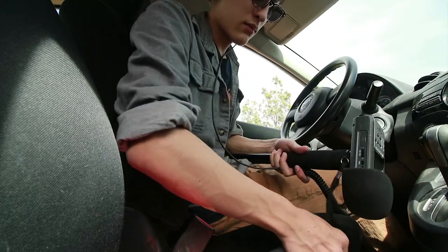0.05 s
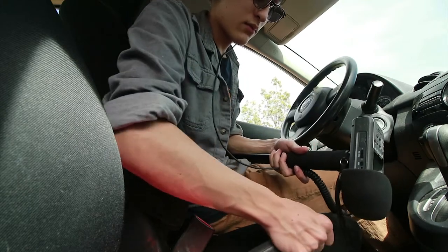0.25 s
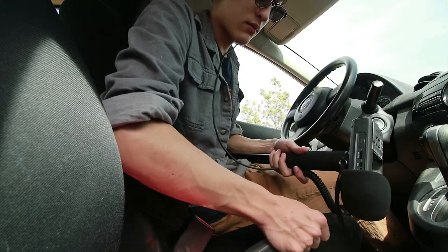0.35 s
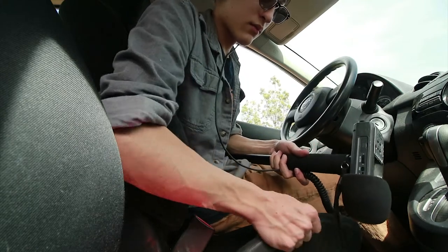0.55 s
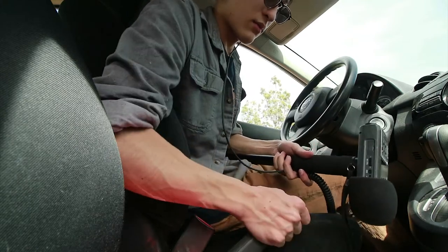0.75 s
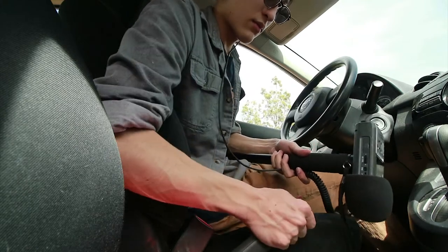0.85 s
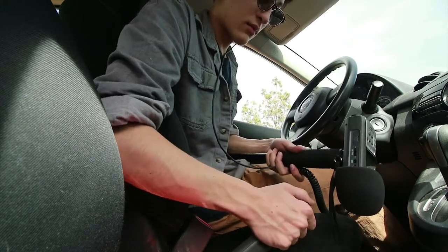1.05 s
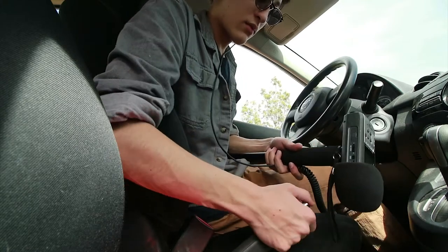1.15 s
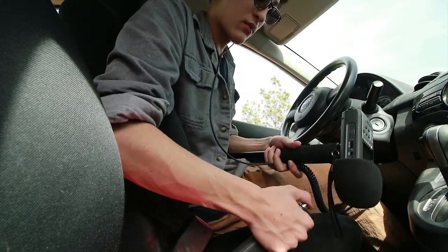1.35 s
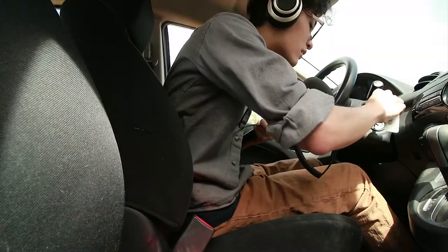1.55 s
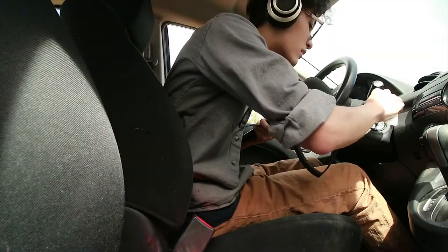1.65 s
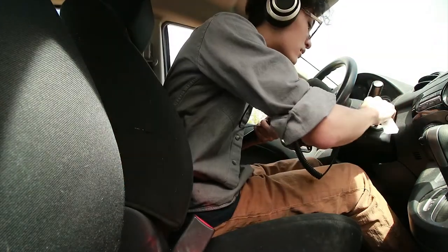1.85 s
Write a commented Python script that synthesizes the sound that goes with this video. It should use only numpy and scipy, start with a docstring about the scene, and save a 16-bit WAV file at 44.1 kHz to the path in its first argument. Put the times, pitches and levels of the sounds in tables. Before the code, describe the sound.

Sharp ratchet clicks of a handbrake being pulled up, close to the microphone in a dry, quiet car cabin. A soft low knock follows, then small plastic clicks from a dashboard control, over faintly rustling cloth.

```python
"""A sleeve rustles and a handbrake ratchets up inside a parked car: its pawl snaps over seven teeth,
each impact exciting the modes of pawl, plate, lever and console. The lever settles with a knock that
shakes the floor. A hand then works a dashboard control in small plastic clicks, one of which sets a
tiny spring ringing. Upholstery absorbs nearly all reverberation; a faint background lies beneath."""
import sys
import numpy as np
from scipy import signal
from scipy.io import wavfile

SR = 44100
rng = np.random.default_rng(int(sys.argv[2]) if len(sys.argv) > 2 else 0)


def dump(signal):
    """Clip the signal to [-1, 1] and save it as 16-bit WAV at the path in sys.argv[1]."""
    limited = np.clip(np.atleast_2d(signal).T, -1, 1)
    pcm = np.round(limited * 32767).astype(np.int16)
    wavfile.write(sys.argv[1], SR, pcm)


N = 83790
AGE = np.arange(SR // 4) / SR   # time since an impact [s]
BAND_EDGES = np.geomspace(22, 17000, 40)   # [Hz]
CENTRES = np.sqrt(BAND_EDGES[1:] * BAND_EDGES[:-1])
SWELL_CYCLES, SOFT_RISE_S = 1, 0.00067   # added build-up, longer for low notes; onset of a soft contact


def from_db(db):
    """Amplitude ratio: a factor of ten for every 20 dB."""
    return 10 ** (np.asarray(db) / 20)


def unit_rms(x):
    """Power normalisation: each row is scaled to rms 1."""
    return x / np.sqrt(np.mean(x ** 2, axis=-1, keepdims=True) + 1e-20)


def at_bands(points):
    """Interpolation in log frequency: (frequency [Hz], value) points read at the band centres."""
    hz, value = np.transpose(points)
    return np.interp(np.log(CENTRES), np.log(hz), value)


def add(out, start_s, sound):
    """Superposition: a sound adds to the mix from its start time on."""
    start = int(start_s * SR)
    out[start:start + len(sound)] += sound[:N - start]


def noise_bands(size):
    """Band-limited noise at rms 1; two alternating sources keep neighbouring bands incoherent."""
    white = rng.standard_normal((2, size + len(AGE)))
    bands = []
    for k, edges in enumerate(zip(BAND_EDGES, BAND_EDGES[1:])):
        bandpass = signal.butter(2, edges, "band", fs=SR, output="sos")
        bands.append(signal.sosfilt(bandpass, white[k % 2])[-size:])
    return unit_rms(np.array(bands))


def band_gains(density_db):
    """Band power is spectral density times bandwidth; the gains share unit power."""
    gains = from_db(density_db) * np.sqrt(np.diff(BAND_EDGES))
    return gains / np.linalg.norm(gains)


def envelope(rise, hold, t60, early_share=0.38, early_t60=0.012):
    """Two-slope exponential decay after a rise and hold; one row for each t60."""
    rise, t60 = np.reshape(rise, (-1, 1)), np.reshape(t60, (-1, 1))
    attack = np.minimum(AGE / (rise + 1 / SR), 1)
    fall = np.maximum(AGE - rise - hold, 0) * np.log(1000)
    early_drop = 1 - early_share + early_share * np.exp(-fall / early_t60)
    return attack * np.exp(-fall / t60) * early_drop


def dense_ring(density_db, shape, body=0, likeness=0):
    """Modal overlap: crowded modes decay as noise; blows on one body share part of their pattern."""
    pattern = np.sqrt(likeness) * body + np.sqrt(1 - likeness) * noise_bands(len(AGE))
    top_band_rms = np.sqrt(np.mean(shape[-1] ** 2))
    return band_gains(density_db) @ unit_rms(pattern * shape) * top_band_rms


def modal_ring(modes, rise, hold=0, scatter_db=0):
    """Free vibration: separate damped sinusoids of random phase, with optional scatter in level."""
    hz, db, t60 = np.transpose(modes)
    waves = np.sin(2 * np.pi * (hz[:, None] * AGE + rng.random((len(hz), 1))))
    strengths = from_db(db + scatter_db * rng.standard_normal(len(hz)))
    return strengths @ (waves * envelope(rise, hold, t60))


# background spectrum: (frequency [Hz], relative density [dB])
BACKGROUND_SPECTRUM = [(15, -33), (25, -7.5), (82, -1.5), (200, -9), (293, -3.5), (754, -7), (818, -13.5),
                       (911, -1.5), (1330, -14.5), (1520, -11), (5730, -19.5), (16000, -30.5)]
def background(level_db=-71):
    """Stationary noise: a faint, steady rush, densest at low frequencies."""
    return from_db(level_db) * (band_gains(at_bands(BACKGROUND_SPECTRUM)) @ noise_bands(N))


def cabin_tail(sound, level_db=-40, t60=0.47, corner_hz=2501):
    """Reverberation: convolution with the weak, dull reflections from glass and trim."""
    spectrum = -10 * np.log10(1 + (CENTRES / corner_hz) ** 2)
    response = band_gains(spectrum) @ (noise_bands(len(AGE)) * envelope(rise=0.00502, hold=0, t60=t60))
    return from_db(level_db) * signal.fftconvolve(sound, response / np.linalg.norm(response))[:N]


# loudness of the moving sleeve: (time [s], level [dB])
SLEEVE_LEVEL = [(0, -78), (.12, -73), (.17, -63), (.35, -70), (.56, -66.5), (.8, -67), (.88, -67),
                (1.1, -73.5), (1.3, -69), (1.42, -75.5), (1.7, -71), (1.9, -73)]
# cloth spectrum: (frequency [Hz], relative density [dB])
SLEEVE_SPECTRUM = [(80, -7), (250, 1.5), (600, -3.5), (1500, -11.5), (5500, -20), (10000, -28.5),
                   (16000, -29.5)]
def sleeve_rustle(grain_db=1, grains_per_s=150):
    """Friction noise: rubbing cloth gives a grainy rustle that follows the arm's movement."""
    t = np.arange(N) / SR
    grain = np.interp(t * grains_per_s, np.arange(N), rng.standard_normal(N))
    level = np.interp(t, *np.transpose(SLEEVE_LEVEL)) + grain_db * grain
    return from_db(level) * (band_gains(at_bands(SLEEVE_SPECTRUM)) @ noise_bands(N))


# fingers touching trim: (time [s], level [dB], hold [s])
FINGER_TOUCHES = [(0.564, -69, 0.0054), (.792, -70, 0.0048), (1.232, -69.5, 0.011), (1.304, -71, 0.03),
                  (1.472, -69, 0.01)]
def finger_brushes(t60=0.033):
    """Sliding friction: each light touch gives a brief hiss."""
    out = np.zeros(N)
    hiss = at_bands([(500, -27), (2000, -10.5), (5500, 5.5), (9000, -10.5), (16000, -14)])
    for start, db, hold in FINGER_TOUCHES:
        add(out, start, from_db(db) * dense_ring(hiss, envelope(SOFT_RISE_S, hold, t60)))
    return out


# bumps of hand and lever: (time [s], level [dB], peak frequency [Hz], T60 [s])
SOFT_CONTACTS = [(0.15, -56.5, 600, 0.052), (0.377, -45, 370, 0.041), (0.376, -52, 680, 0.065),
                 (.544, -46, 300, 0.05), (0.865, -62, 1390, .08), (.990, -56, 104, 0.16),
                 (1.119, -58, 98.2, 0.1), (1.377, -61, 1200, 0.036)]
def soft_bumps(width_octaves=0.77):
    """Cushioned impact: a soft contact puts its energy in one low spectral hump."""
    out = np.zeros(N)
    for start, db, hz, t60 in SOFT_CONTACTS:
        hump = -30 * np.log10(1 + (np.log2(CENTRES / hz) / width_octaves) ** 2)
        shape = envelope(SOFT_RISE_S + SWELL_CYCLES / hz, 0, t60)
        add(out, start, from_db(db) * dense_ring(hump, shape))
    return out


# clicks of the control: (time [s], level [dB], tilt [dB/octave], bass gain [dB],
# ping frequency [Hz], relative ping level [dB], hollow note frequency [Hz], relative note level [dB])
CONTROL_CLICKS = [(.151, -56, -1, 11, 6000, -4, 1740, -2), (1.439, -36, 0.3, 5, 4896, 0, 1880, -10.5),
                  (1.4491, -43, -1, 13.5, 6650, 6.5, 1840, 0), (1.511, -55, 0, 3, 6400, -11, 2930, -9),
                  (1.516, -54, 0.5, -3, 4800, -3, 1930, -3),
                  (1.5272, -41.5, 0, -10.5, 5000, -1.5, 2120, -4),
                  (1.627, -34, -0.5, -14, 3920, 1, 910, -18), (1.6394, -34.5, 0, -1, 3530, 0.5, 830, -13.5),
                  (1.6675, -38, 3, 15, 3990, -8, 845, -15), (1.6937, -42, -2, -12, 3350, -1, 1970, -14),
                  (1.7966, -50, 1.5, -3, 3990, -5, 1090, 0.5),
                  (1.806, -64.5, 1.5, 2.5, 5000, -6, 1090, -7.5),
                  (1.867, -55.5, -1.5, -4.5, 3500, -3.5, 2180, -5),
                  (1.874, -47.5, -2.5, -11, 5400, -3.5, 2240, -8),
                  (1.8877, -36.5, 0.5, -1, 6970, -4, 386, -10.5)]
# ring of the plastic housing: (frequency [Hz], relative density [dB])
HOUSING_SPECTRUM = [(94, -40.5), (160, -8.5), (471, -6.5), (1410, -10), (1810, -7.5), (2940, -4),
                    (3230, -5.5), (4000, -3.5), (4400, -37), (4750, -4), (6990, -3.5), (10500, -19),
                    (11500, -14), (15100, -22.5), (16000, -28)]
# damping of the housing: (frequency [Hz], T60 [s])
HOUSING_DECAY = [(200, 0.033), (1000, .07), (4000, 0.06), (13000, 0.039)]
# the tiny spring's mode: (frequency [Hz], level [dB], T60 [s])
SPRING_MODE = [(8030, -57, .28)]
def dashboard_clicks(rise=0.00037, hold=0.00039, bass_corner_hz=794, spring_start_s=1.6393):
    """Impulse response: hard contacts ring the housing, three high modes and a note; one, a spring."""
    ping_spread, ping_t60, note_t60 = 0.045, 0.034, 0.042
    out, body = np.zeros(N), noise_bands(len(AGE))
    shape = envelope(rise + SWELL_CYCLES / CENTRES, hold, at_bands(HOUSING_DECAY))
    for start, db, tilt, bass_db, ping_hz, ping_db, note_hz, note_db in CONTROL_CLICKS:
        bass_shelf = bass_db / (1 + (CENTRES / bass_corner_hz) ** 2)
        spectrum = at_bands(HOUSING_SPECTRUM) + tilt * np.log2(CENTRES) + bass_shelf
        housing = dense_ring(spectrum, shape, body, likeness=0.38)
        ping = [(ping_hz * (1 + k * ping_spread), ping_db - 5 * abs(k), ping_t60) for k in (-1, 0, 1)]
        tones = modal_ring(ping + [(note_hz, note_db, note_t60)], rise)
        add(out, start, from_db(db) * (housing + tones))
    add(out, spring_start_s, modal_ring(SPRING_MODE, rise))
    return out


# the settling knock: (frequency [Hz], relative density [dB])
KNOCK_SPECTRUM = [(59, -25), (100, -9), (328, -10), (634, -9.5), (1170, -13), (1390, -12), (2320, -3),
                  (2580, -11.5), (4110, -5), (8110, -18.5), (16000, -51)]
# damping of the lever, in knock and ratchet alike: (frequency [Hz], T60 [s])
LEVER_DECAY = [(100, 0.22), (270, .135), (700, 0.12), (1800, 0.059), (5000, 0.049), (13000, .048)]
# modes of the floor pan: (frequency [Hz], level [dB], T60 [s])
FLOOR_RESONANCES = [(100, -48.5, 0.38), (113, -43, 0.21), (237.3, -48, 0.23), (467.4, -48.5, 0.14),
                    (631, -46, 0.053), (643, -39.5, 0.05)]
def lever_settle(start_s=0.9315, knock_db=-33):
    """Structure-borne sound: the lever falls back on the pawl with a dull knock and the floor booms."""
    out = np.zeros(N)
    shape = envelope(rise=0.0012, hold=0.0021, t60=at_bands(LEVER_DECAY))
    knock = from_db(knock_db) * dense_ring(at_bands(KNOCK_SPECTRUM), shape)
    floor = modal_ring(FLOOR_RESONANCES, rise=0.0098)
    add(out, start_s, knock + floor)
    return out


def detuned(hz, spread=0.0056):
    """Contact loading: each tooth loads the metal differently and shifts a mode slightly."""
    return hz * (1 + spread * rng.standard_normal())


# the pawl's drops: (time [s], level [dB], rise [s], hold [s], tilt [dB/octave],
# pawl gain [dB], console gain [dB])
TOOTH_IMPACTS = [(0.1993, -21, 0.0015, 0.0033, -0.05, -5, 4), (.2370, -17, .0018, 0.0022, 0.2, -8, 1.5),
                 (0.2836, -22, .0007, 0.0051, -1, -6, 3), (0.4431, -17, 0.0019, 0.00083, 0, -3.5, -1.5),
                 (0.6205, -17.5, 0.0028, 0.00092, 0, 1, -1.5), (0.67, -16.5, .0015, 0.0018, 0, 1, 0.5),
                 (0.7041, -16, 0.0026, 0.00069, 0, -1, -1)]
# ring of the lever: (frequency [Hz], relative density [dB])
LEVER_SPECTRUM = [(41, -51), (70, -23), (268, -7.5), (451, -21), (635, -16), (892, -21.5), (1440, -12),
                  (1760, -3), (2020, -23), (2320, -5.5), (2720, -10.5), (3910, -3.5), (5020, -5.5),
                  (5620, 0), (6300, -9.5), (7220, -1), (8660, -14), (12700, -16), (16000, -29)]
# modes of the pawl: (frequency [Hz], relative level [dB])
PAWL_RESONANCES = [(3850, -6.5), (4170, -7.5), (4360, -13.5)]
# modes of the toothed plate and of the console: (frequency [Hz], relative level [dB], T60 [s])
PLATE_RESONANCES = [(3410, -14.5, .04), (5480, -13.5, 0.019), (5800, -12, .035), (6530, -10.5, 0.018),
                    (6973, -10, .04), (7645, -9.5, 0.024), (12270, -17.5, .045)]
CONSOLE_RESONANCES = [(298, -29.5, .1), (470, -38, 0.12), (611, -27.5, 0.12), (767, -33.5, .1),
                      (1663, -21, .04), (1797, -15, 0.054), (2407, -19, .045)]
def handbrake_ratchet(lever_db=-2.5, plate_db=-2.5, pawl_t60=0.045):
    """Impact excitation: the pawl snaps off each tooth, ringing itself, plate, lever and console."""
    out, body = np.zeros(N), noise_bands(len(AGE))
    pivot_hz = PAWL_RESONANCES[0][0]
    for start, db, rise, hold, tilt, pawl_db, console_db in TOOTH_IMPACTS:
        spectrum = at_bands(LEVER_SPECTRUM) + tilt * np.log2(CENTRES)
        shape = envelope(rise + SWELL_CYCLES / CENTRES, hold, at_bands(LEVER_DECAY))
        lever = from_db(lever_db) * dense_ring(spectrum, shape, body, likeness=0.7)
        plate_modes = [(detuned(hz), level + tilt * np.log2(hz / pivot_hz), t60)
                       for hz, level, t60 in PLATE_RESONANCES]
        pawl_modes = [(detuned(hz), level, pawl_t60) for hz, level in PAWL_RESONANCES]
        plate = from_db(plate_db) * modal_ring(plate_modes, rise, hold, scatter_db=4)
        pawl = from_db(pawl_db) * modal_ring(pawl_modes, rise, hold)
        console = from_db(console_db) * modal_ring(CONSOLE_RESONANCES, rise, hold)
        add(out, start, from_db(db) * (console + lever + plate + pawl))
    return out


def scene():
    """Superposition: contacts, their reverberation, rustle and background sum in one channel."""
    contacts = handbrake_ratchet() + lever_settle() + soft_bumps() + dashboard_clicks() + finger_brushes()
    return (background() + contacts + cabin_tail(contacts) + sleeve_rustle())[None]


def record(dry):
    """Band limiting: the microphone sheds the deep bass, and the top is cut steeply."""
    low_cut_hz, high_cut_hz = 60, 16200
    highpass = signal.butter(2, low_cut_hz, "high", fs=SR, output="sos")
    lowpass = signal.ellip(10, .2, 80, high_cut_hz, fs=SR, output="sos")
    return signal.sosfilt(lowpass, signal.sosfilt(highpass, dry))


dry = scene()
out = record(dry)
dump(out)
```